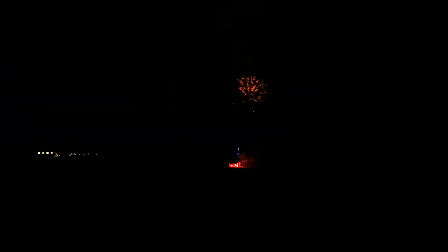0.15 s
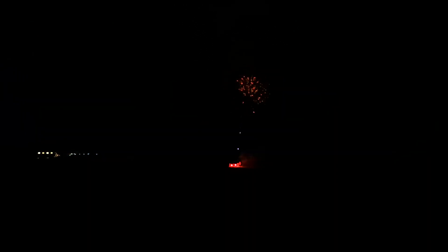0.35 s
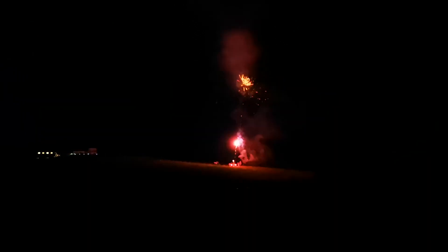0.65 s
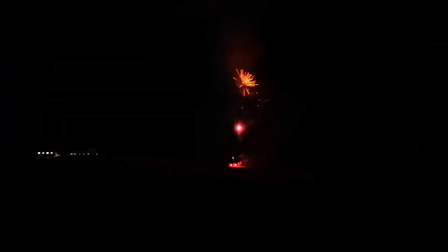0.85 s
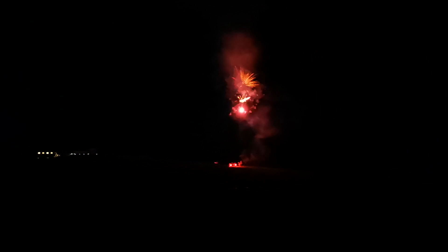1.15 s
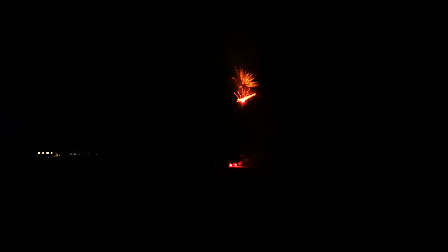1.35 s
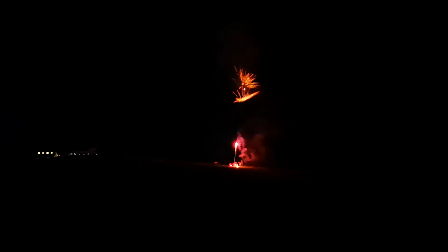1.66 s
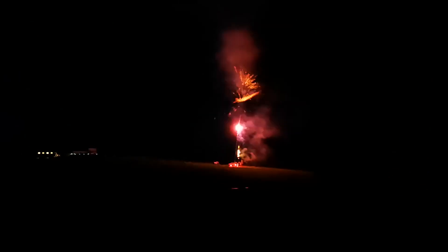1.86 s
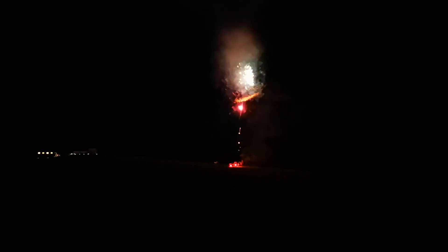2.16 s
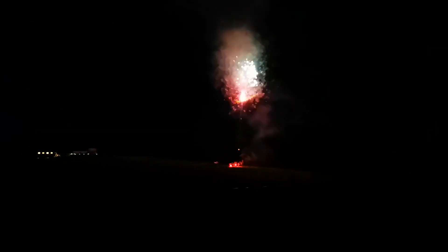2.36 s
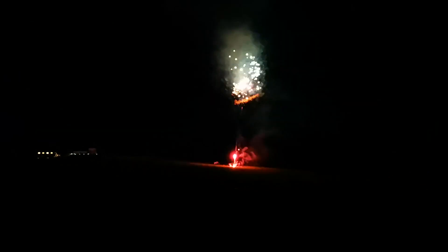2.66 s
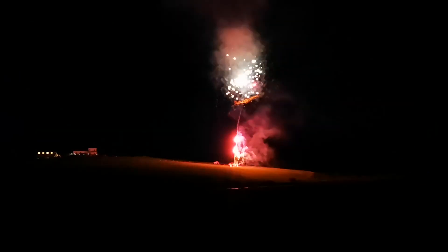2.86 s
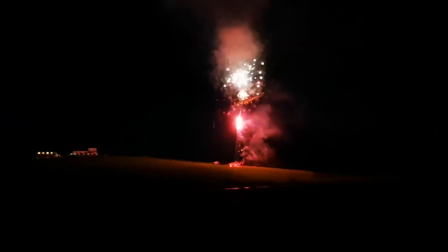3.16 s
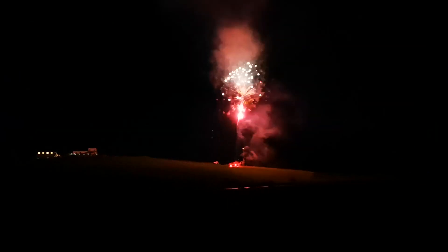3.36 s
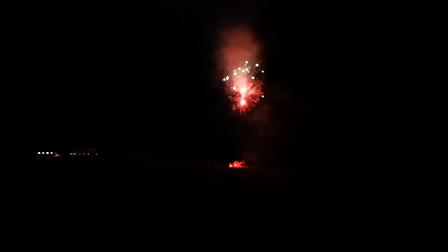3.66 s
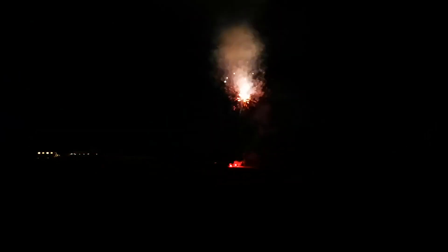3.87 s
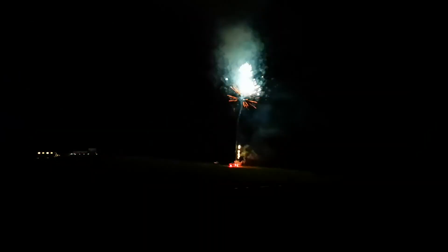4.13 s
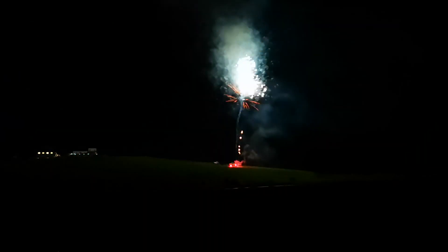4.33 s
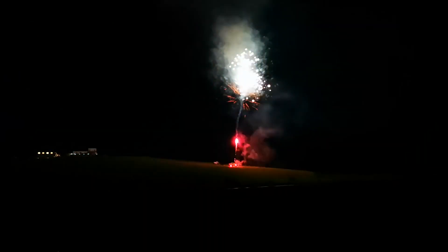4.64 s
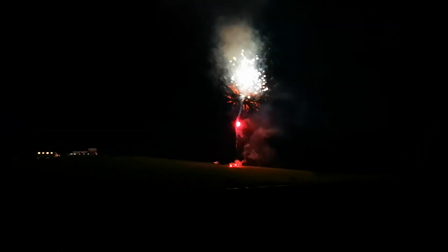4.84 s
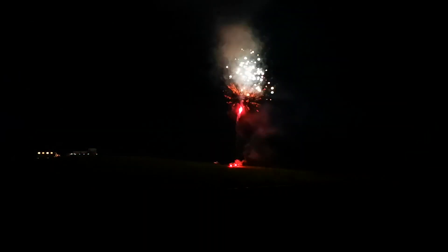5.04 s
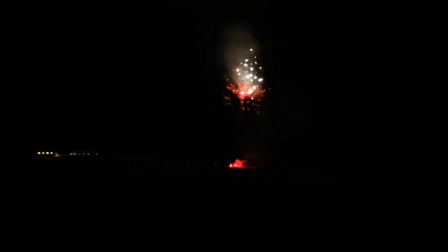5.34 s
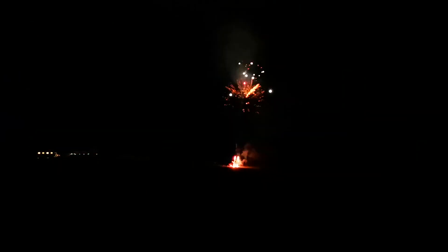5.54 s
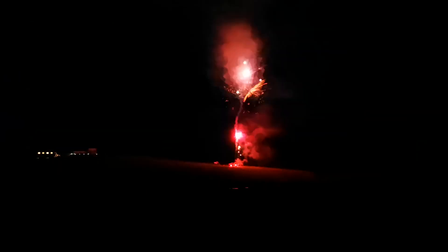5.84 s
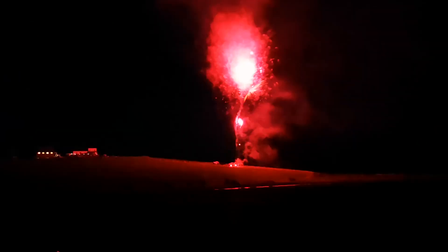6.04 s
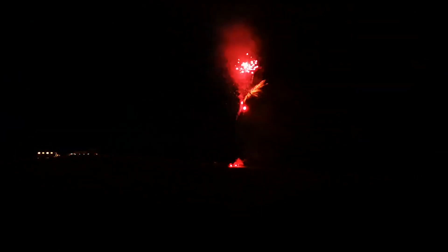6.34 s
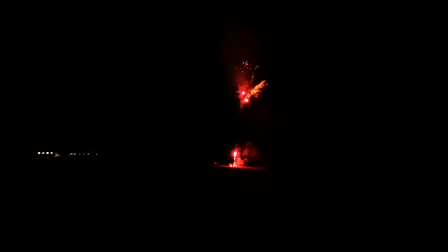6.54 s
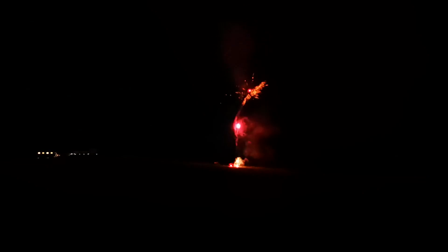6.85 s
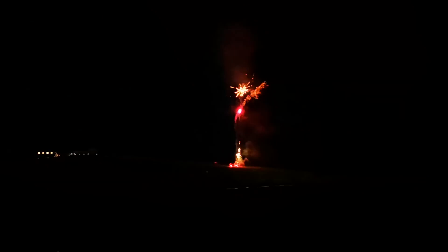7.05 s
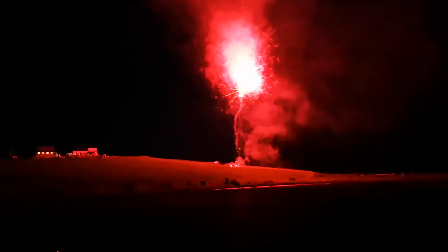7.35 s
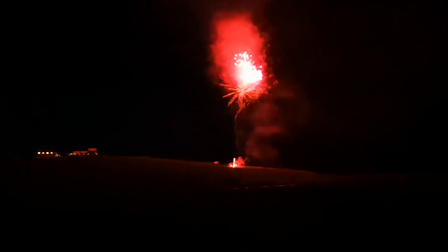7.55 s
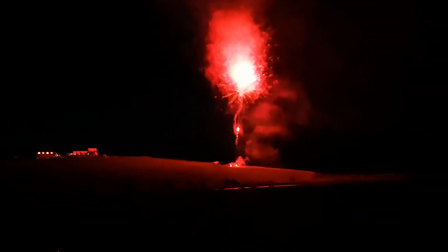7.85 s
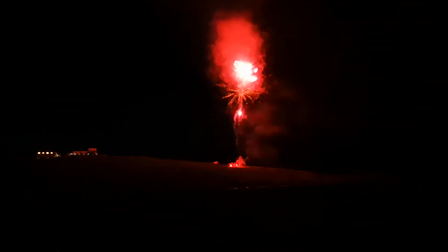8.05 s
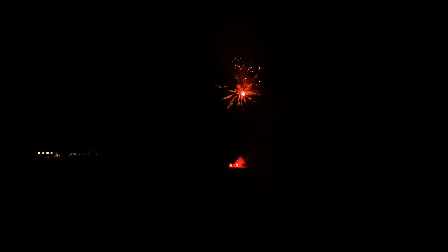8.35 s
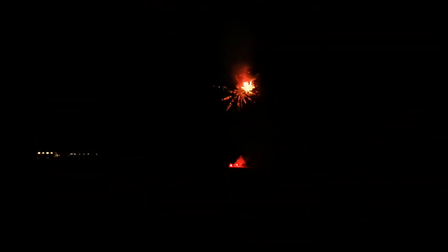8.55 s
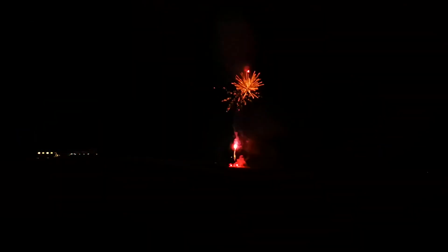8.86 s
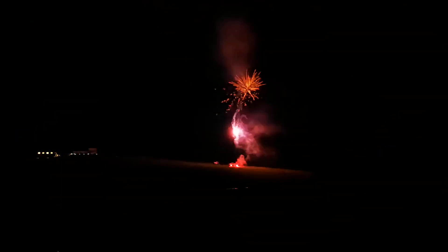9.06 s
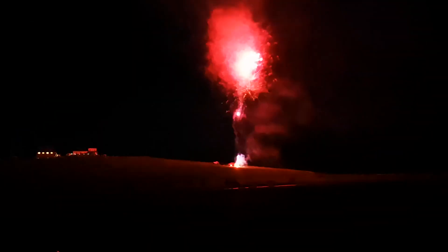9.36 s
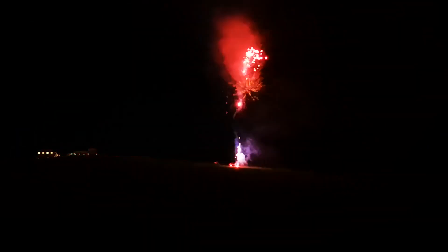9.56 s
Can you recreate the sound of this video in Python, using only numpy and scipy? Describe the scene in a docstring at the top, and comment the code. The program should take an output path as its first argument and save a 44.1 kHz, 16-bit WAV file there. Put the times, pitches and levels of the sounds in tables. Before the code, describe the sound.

Sharp firework bangs and small ringing launch pops over a quiet night field, each burst followed by knocking reflections and a low rolling echo.

```python
"""Firework shells burst overhead with sharp bangs, at night over an open field.
Bursts: blast waves plus a duller ground reflection. Launches: a low thump and a ringing tube crack.
Echoes: shaped stereo noise from near ground, field, field edge and far land; slaps: short filtered repeats.
Background: steady night noise and faint cricket chirps made of pulsed tones."""
import sys
import numpy as np
from scipy import signal
from scipy.fft import rfft, irfft, next_fast_len
from scipy.io import wavfile
from scipy.ndimage import uniform_filter1d, minimum_filter1d, map_coordinates

SR = 44100
rng = np.random.default_rng(int(sys.argv[2]) if len(sys.argv) > 2 else 0)


def digitize_waveform(pressure):
    """Quantize a signal to 16-bit integers and store it at the path in sys.argv[1].

    Rows of a 2-D input are taken as channels; values are limited to [-1, 1].
    """
    field = np.atleast_2d(pressure).T
    bounded = np.clip(field, -1, 1)
    quanta = np.round(bounded * 32767).astype(np.int16)
    wavfile.write(sys.argv[1], SR, quanta)


N = 427769
TIME_S = np.arange(N) / SR

# night background: (frequency [Hz], relative density [dB per Hz])
NIGHT_SPECTRUM = [(12, -29.5), (20, -6.5), (43, -5.5), (74, 1.5), (123, -17), (459, -17), (513, -19.5),
                  (849, -25), (2080, -28.5), (4300, -44.5), (5080, -29), (6540, -48), (7110, -36),
                  (8180, -47.5), (16000, -47.5)]
# cricket chirps: (start [s], pitch [Hz], relative level [dB])
CHIRPS = [(-.06, 7250, -82), (.255, 7200, -81), (.61, 7170, -80), (.745, 6350, -87), (0.95, 7250, -75),
          (9.02, 7470, -80)]
# scattered sound, left-right correlation, clipped to +-1: (frequency [Hz], correlation [1])
LIKENESS = [(60, 0.8), (130, 1.26), (290, 0.5), (640, -.5), (1410, 0.12), (3100, -0.03), (15000, 0)]
# left minus right of scattered sound; bangs take a share of it: (frequency [Hz], difference [dB])
BALANCE = [(200, 0), (380, 0), (700, 4.5), (1290, 2), (2380, 1.5), (8120, 2.5), (15000, -8)]
# echo colours, far land to near ground: (frequency [Hz], relative density [dB per Hz])
FAR_SPECTRUM = [(24, -33.5), (40, 0.5), (66, -0.5), (164, -20), (218, -16), (257, -12.5), (368, -9.5),
                (566, -11.5), (849, -8), (1470, -18), (2050, -13.5), (4300, -32), (7630, -49), (8590, -48),
                (12000, -59), (15600, -85.5), (22000, -120)]
EDGE_SPECTRUM = [(150, -28), (500, -18), (800, -2.5), (1150, 1), (1600, -3), (5000, -40)]
FIELD_SPECTRUM = [(59, -34.5), (100, -3), (210, -1), (244, -6), (302, -6), (335, -6), (558, -13),
                  (872, -0.5), (1130, -13.5), (1720, -5), (3320, -13.5), (7450, -17), (12100, -42.5),
                  (15000, -48), (16000, -61.5)]
BOOM_SPECTRUM = [(60, -19), (130, -6), (185, 0), (260, -2.5), (330, -0.5), (480, -3), (900, -11),
                 (4000, -62)]
RATTLE_SPECTRUM = [(60, 0.5), (120, 7), (220, -2), (600, -11), (1050, -9), (1600, 1), (2400, -3.5),
                   (3100, -3), (4200, -16.5), (7800, -23), (10000, -46), (12500, -74)]
NEAR_SPECTRUM = [(30, -18), (100, -0.5), (200, 0.5), (320, -9.5), (420, -4), (620, -12), (900, -5),
                 (1350, -18), (1700, -7.5), (2500, -14), (4300, -23), (7600, -25.5), (10000, -36.5),
                 (16000, -82)]
# reflections from things close by: (delay [s], level [dB])
SLAPS = [(.0095, -27.5), (.0138, -22), (.024, -24), (.036, -28), (.047, -35.5)]
# launches: (time [s], relative thump [dB], relative main ring [dB], relative overtones [dB])
LAUNCHES = [(0.8174, -17, -9.5, -5), (1.2226, -19.5, -3.8, -9.5), (2.2765, -14, 2.5, -6),
            (2.4821, -22.5, -10.5, -8), (3.3792, -20, -11.5, -14), (3.478, -14, -4.5, -18),
            (3.5131, -17.5, -1.5, -1.5), (3.543, -16.5, -1.5, -14), (5.2144, -15.5, -8, -11),
            (6.2676, -24, -7.5, -6), (6.2965, -18, -6.5, -14), (6.3425, -14, -9, -4.5),
            (7.253, -19, -7, -5.5), (7.6162, -19, -13.5, -5), (8.32, -14, -2.5, -7),
            (9.4506, -19.5, 0, -3.5)]
# lift-charge thump: (frequency [Hz], relative density [dB per Hz])
THUMP_SPECTRUM = [(20, -24), (42, -6.5), (65, -0.5), (82, -3.5), (107, 2), (130, -6), (152, -9), (190, -31),
                  (260, -27), (600, -43.5), (1500, -49), (8000, -78)]
# main ring of a mortar tube: (multiple of tube pitch [1], relative level [dB], t60 [s])
TUBE_MODES = [(.87, -13.5, 0.046), (1.0, 0.5, 0.016), (1.21, -3.5, .014)]
# higher tube modes, then the muzzle snap: (frequency [Hz], relative level [dB], t60 [s])
OVERTONES = [(2824, -1.5, 0.02), (3050, -6, 0.012)]
SNAP_MODES = [(3690, -3, 0.034), (4830, -11, 0.0091), (5580, -3.5, 0.018), (7300, -13.5, 0.015)]
# shell bursts: (time [s], relative blast [dB], overpressure length [s], angle above horizon [degrees])
BURSTS = [(1.2789, 1.5, 0.00037, 23.8), (1.835, 4, 0.00038, 21.2), (2.7283, 4, 0.0003, 26),
          (3.282, 4.5, 0.00059, 21.9), (3.9076, 2.5, 0.00046, 21.8), (4.6049, 1.5, 0.00036, 20.7),
          (4.6732, 3.5, 0.00049, 23.1), (4.7643, 3.5, 0.00034, 24), (5.0565, 5.5, 0.0004, 23.4),
          (6.130, 1, 0.00062, 22.9), (6.6161, 5, 0.00041, 26.5), (7.7503, 11.5, 0.00039, 23.3),
          (7.8815, 6, 0.00038, 25.4), (7.9786, 3, 0.00035, 24), (8.4607, 9, .00032, 26.1),
          (9.2486, 3.5, 0.00045, 22.9)]
# bang colour: (frequency [Hz], relative density [dB per Hz])
BANG_SPECTRUM = [(100, 0.5), (300, -2.26), (550, -7.5), (950, -1), (1300, -1.5), (1750, 3.5), (2300, -2),
                 (3000, -1.5), (4200, -7), (7400, -2), (8600, -13.5), (12000, -25), (16000, -33)]

NIGHT_DB = -61
EARLIER_BURST_S = -0.58  # before the start; only its echoes are heard
FAR_DB, FAR_ATTACK_S, FAR_HOLD_S, FAR_T60_S = -57.5, 0.26, 0.51, 3.5
EDGE_DB, EDGE_DELAY_S, EDGE_ATTACK_S, EDGE_HOLD_S, EDGE_T60_S = -61, 0.357, 0.056, 0.03, 0.33
FIELD_DB, FIELD_RIM_S, FIELD_RISE_DB, FIELD_DB_PER_DOUBLING, AIR_DB_PER_S = -47, 0.14, 4.5, 9.5, 4
RATTLE_DB, RATTLE_T60_S = -32.5, 0.16
TUBE_HZ = 1694
SNAP_DB, SNAP_DB_PER_DB = 0.5, 1.4  # snap grows with the lift charge
EAR_HEIGHT_M, SOUND_M_PER_S = 1.6, 343
# reference burst
USUAL_DB, USUAL_LENGTH_S, USUAL_DEGREES = 5, 0.0004, 23.4
# stronger and shorter blasts: steeper shock front
FRONT_HZ, FRONT_OCTAVES_PER_DB, FRONT_OCTAVES_PER_DOUBLING = 11500, 0.14, -0.9
# ground reflects best at a shallow angle, gives way under a strong blast
GROUND_DB, GROUND_DB_PER_DEGREE, GROUND_DB_PER_DB = -8.5, -0.63, -0.68
# strong, long and low blasts scatter most
SCATTER_DB, SCATTER_DB_PER_DB, SCATTER_DB_PER_DOUBLING, SCATTER_DB_PER_DEGREE = 4.5, 0.3, 5, -0.66
CUTOFF_HZ = 16600


def from_db(db):
    """Decibels to amplitude gain."""
    return 10 ** (np.asarray(db) / 20)


def at_hz(points, hz):
    """Interpolate a table on a log-frequency axis."""
    known_hz, value = np.transpose(points)
    return np.interp(np.log(np.maximum(hz, 1)), np.log(known_hz), value)


def add(out, start_s, sound):
    """Mix a sound in at its time."""
    i = int(round(start_s * SR))
    out[..., i:i + sound.shape[-1]] += sound[..., :N - i]


def diffuse(spectrum):
    """Coloured stereo noise from all around, rms 1; mid and side weights set the correlation."""
    size = next_fast_len(N)
    hz = np.arange(size // 2 + 1) * SR / size
    mid, side = rfft(rng.standard_normal((2, size)))
    alike = np.clip(at_hz(LIKENESS, hz), -1, 1)
    signs = np.array([[1], [-1]])
    pair = np.sqrt(1 + alike) * mid + signs * np.sqrt(1 - alike) * side
    colour_db = at_hz(spectrum, hz) + signs * at_hz(BALANCE, hz) / 2
    noise = irfft(pair * from_db(colour_db) * (hz > 10), size)[:, :N]
    return noise / np.sqrt(np.mean(noise ** 2))


def night():
    """Steady diffuse noise of the quiet night."""
    return from_db(NIGHT_DB) * diffuse(NIGHT_SPECTRUM)


def crickets(length_s=0.086, strokes_per_s=80, level_db=6.0, droop=0.012):
    """Each chirp is a run of wing strokes, each sagging slightly in pitch."""
    out = np.zeros(N)
    t = np.arange(int(length_s * SR)) / SR
    stroke = t * strokes_per_s % 1
    shape = np.sin(np.pi * stroke) ** 2 * np.sqrt(np.abs(np.sin(np.pi * t / length_s)))
    for start_s, hz, db in CHIRPS:
        tone = np.sin(2 * np.pi * np.cumsum(hz * (1 - droop * (stroke - 0.5))) / SR)
        chirp = from_db(db + level_db) * shape * tone
        add(out, max(start_s, 0), chirp[max(0, int(-start_s * SR)):])
    return out


def dying(level_db, t60_s):
    """Exponential decay, cut at -60 dB."""
    return from_db(level_db - 60 * TIME_S[TIME_S < t60_s] / t60_s)


def rolling(level_db, attack_s, hold_s, t60_s, delay_s=0):
    """Envelope of an echo that swells, holds and dies away."""
    t = TIME_S[TIME_S < delay_s + attack_s + hold_s]
    rise = np.clip((t - delay_s) / attack_s, 0, 1)
    return np.r_[from_db(level_db) * rise, dying(level_db, t60_s)]


def spreading():
    """Open-field answer: builds up to the rim, then thins with distance and loss in the air."""
    t = TIME_S[:N // 3]
    reach = t / FIELD_RIM_S
    rise_db = FIELD_RISE_DB * np.maximum(1 - reach, 0)
    distance_db = FIELD_DB_PER_DOUBLING * np.log2(np.maximum(reach, 1))
    return from_db(FIELD_DB - rise_db - distance_db - AIR_DB_PER_S * t)


def returns(hits, envelope, size=25):
    """Envelope of the echoes of (time [s], level [dB]) hits; they overlap in power."""
    power, total = envelope ** 2, np.zeros(N)
    for start_s, db in hits:
        add(total, max(start_s, 0), power[max(0, int(-start_s * SR)):] * from_db(db) ** 2)
    # no shock front in scattered sound: onset takes about 0.5 ms
    return uniform_filter1d(np.sqrt(total), size)


def swell(rate_hz, depth_db, size=4096):
    """Randomly wandering gain, as echoes come back from uneven land."""
    knots = rng.normal(0, 1, size)
    return from_db(depth_db * map_coordinates(knots, [TIME_S * rate_hz], mode="wrap"))


def scatter_db(db, length_s, degrees):
    """How strongly a blast sets the surroundings echoing."""
    doublings = np.log2(length_s / USUAL_LENGTH_S)
    return (SCATTER_DB + SCATTER_DB_PER_DB * (db - USUAL_DB) + SCATTER_DB_PER_DOUBLING * doublings
            + SCATTER_DB_PER_DEGREE * (degrees - USUAL_DEGREES))


def echoes(first_db=-24, first_t60_s=0.027, near_db=-32.0, near_t60_s=0.18, boom_db=-38, boom_t60_s=0.38,
           launch_share_db=-13, earlier_db=-3.5):
    """High bursts set the whole field echoing; launches at ground level carry far less."""
    high = [(s, scatter_db(db, length_s, degrees)) for s, db, length_s, degrees in BURSTS]
    low = [(s, ring_db / 2) for s, _, ring_db, _ in LAUNCHES]
    # far echoes vary half as much from shell to shell as close ones
    every = [(s, db / 2) for s, db in high]
    every += [(s, db + launch_share_db) for s, db in low]
    every += [(EARLIER_BURST_S, earlier_db)]

    first = returns(high, dying(first_db, first_t60_s))
    near = np.hypot(first, returns(high, dying(near_db, near_t60_s)))
    boom = returns(high, dying(boom_db, boom_t60_s))
    edge = returns(every, rolling(EDGE_DB, EDGE_ATTACK_S, EDGE_HOLD_S, EDGE_T60_S, EDGE_DELAY_S))
    rattle = returns(low, dying(RATTLE_DB, RATTLE_T60_S))
    field = returns(every, spreading())
    far = returns(every, rolling(FAR_DB, FAR_ATTACK_S, FAR_HOLD_S, FAR_T60_S))

    # few early echoes: fast swell makes separate knocks
    out = near * diffuse(NEAR_SPECTRUM) * swell(rate_hz=350, depth_db=3.5)
    out += boom * diffuse(BOOM_SPECTRUM)
    out += edge * diffuse(EDGE_SPECTRUM)
    out += rattle * diffuse(RATTLE_SPECTRUM) * swell(rate_hz=120, depth_db=5.5)
    out += field * diffuse(FIELD_SPECTRUM) * swell(rate_hz=29, depth_db=1.8)
    out += far * diffuse(FAR_SPECTRUM) * swell(rate_hz=5.7, depth_db=1.03)
    return out


def slaps(direct, low_hz=170, high_hz=3500, spread_ms=0.15):
    """Small things nearby throw back the middle of the spectrum, from alternating sides."""
    out = np.zeros((2, N))
    band = signal.butter(1, [low_hz, high_hz], "band", fs=SR, output="sos")
    dull = signal.sosfilt(band, direct)
    for k, (delay_s, db) in enumerate(SLAPS):
        for ear in range(2):
            offset_s = (-1) ** (k + ear) * spread_ms / 1000 / 2
            add(out[ear], delay_s + offset_s, from_db(db) * dull[ear])
    return out


def causal_pulse(spectrum, size=8192):
    """Minimum-phase pressure pulse by cepstral folding, deepest trough at -1."""
    hz = np.arange(size // 2 + 1) * SR / size
    cepstrum = irfft(np.log(from_db(at_hz(spectrum, hz))))
    fold = np.r_[1, np.full(size // 2 - 1, 2), np.zeros(size // 2)]
    pulse = irfft(np.exp(rfft(cepstrum * fold)))
    return pulse / -pulse.min()


def ring(modes, db, t, scale=1, detune=0.037, uneven_db=2.5, ear_db=1.84):
    """Struck modes as a stereo pair; each shot finds them slightly changed."""
    hz, mode_db, t60_s = np.transpose(modes)
    off, strength, ear = rng.standard_normal((3, len(modes)))
    tones = np.sin(2 * np.pi * np.outer(hz * scale * (1 + detune * off), t))
    waves = tones * np.exp(-np.log(1000) * np.outer(1 / t60_s, t))
    waves = waves / np.linalg.norm(waves, axis=1, keepdims=True)
    ears_db = np.outer([1, -1], ear_db * ear)
    return from_db(db + mode_db + uneven_db * strength + ears_db) @ waves


def launches(thump_db=-1.5, mouth_hz=1230, air_hz=7800, size=4096):
    """The lift charge pushes out a low puff and sets the air in the tube ringing."""
    out, t = np.zeros((2, N)), np.arange(size) / SR
    puff = causal_pulse(THUMP_SPECTRUM, size=size)
    mouth = signal.butter(7, mouth_hz, "high", fs=SR, output="sos")
    air = signal.butter(5, air_hz, fs=SR, output="sos")
    for start_s, puff_db, main_db, overtone_db in LAUNCHES:
        crack = ring(TUBE_MODES, main_db, t, TUBE_HZ)
        crack += ring(OVERTONES, overtone_db, t)
        crack += ring(SNAP_MODES, SNAP_DB + SNAP_DB_PER_DB * puff_db, t)
        shot = signal.sosfilt(mouth, crack) + from_db(puff_db + thump_db) * puff
        add(out, start_s, signal.sosfilt(air, shot))
    return out


def shock_front_hz(db, length_s):
    """How far up the spectrum the shock front of a blast reaches."""
    doublings = np.log2(length_s / USUAL_LENGTH_S)
    octaves = FRONT_OCTAVES_PER_DB * (db - USUAL_DB) + FRONT_OCTAVES_PER_DOUBLING * doublings
    return FRONT_HZ * 2 ** octaves


def ground_bounce(db, degrees):
    """Delay [s] and level [dB] of a blast's reflection off the ground."""
    delay_s = 2 * EAR_HEIGHT_M * np.sin(np.radians(degrees)) / SOUND_M_PER_S
    angle_db = GROUND_DB_PER_DEGREE * (degrees - USUAL_DEGREES)
    return delay_s, GROUND_DB + angle_db + GROUND_DB_PER_DB * (db - USUAL_DB)


def bangs(ground_hz=3200, left_lag_ms=0.027, left_share=0.2, level_db=2.0, size=2048):
    """Blast waves: shock front, short overpressure, suction; the ground repeats each one duller."""
    out = np.zeros((2, N))
    hz = np.arange(size // 2 + 1) * SR / size
    s = 2j * np.pi * hz
    lead_s = size / 2 / SR  # centres the blast in its block
    left = from_db(left_share * at_hz(BALANCE, hz)) * np.exp(-s * left_lag_ms / 1000)
    ears = np.array([left, np.ones_like(left)]) * from_db(at_hz(BANG_SPECTRUM, hz) + level_db)
    for start_s, db, length_s, degrees in BURSTS:
        delay_s, echo_db = ground_bounce(db, degrees)
        front = 1 / (1 + 1j * hz / shock_front_hz(db, length_s))
        blast = SR * s * length_s ** 2 / (1 + s * length_s) ** 2 * front
        ground = 1 + from_db(echo_db) * np.exp(-s * delay_s) / (1 + 1j * hz / ground_hz)
        spectrum = from_db(db) * blast * ground * ears * np.exp(-s * lead_s)
        add(out, start_s - lead_s, irfft(spectrum))
    return out


def scene(launch_slap_db=-6):
    """Fireworks and echoes over the quiet night; launches, low on the ground, slap back less."""
    high, low = bangs(), launches()
    close = slaps(high + from_db(launch_slap_db) * low)
    return night() + crickets() + echoes() + close + low + high


def record(dry, size=21, overload_db=4.0):
    """Microphone overload clips the peaks, a very fast limiter holds full scale, a low-pass cuts the top."""
    clipped = np.clip(dry, -from_db(overload_db), from_db(overload_db))
    allowed = 1 / np.maximum(np.abs(clipped), 1)
    gain = uniform_filter1d(minimum_filter1d(allowed, size), size)
    low_pass = signal.cheby2(14, 40, CUTOFF_HZ, fs=SR, output="sos")
    return signal.sosfiltfilt(low_pass, clipped * gain)


dry = scene()
out = record(dry)
digitize_waveform(out)
```